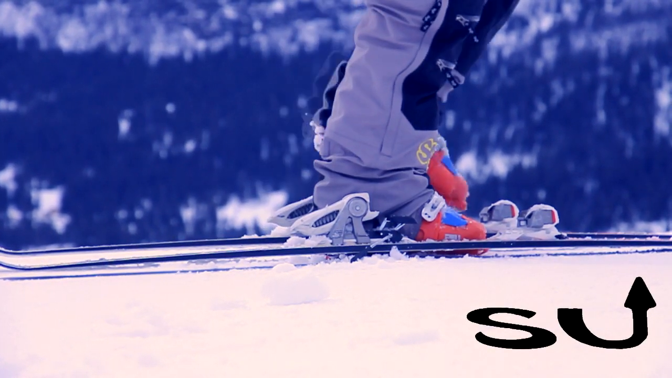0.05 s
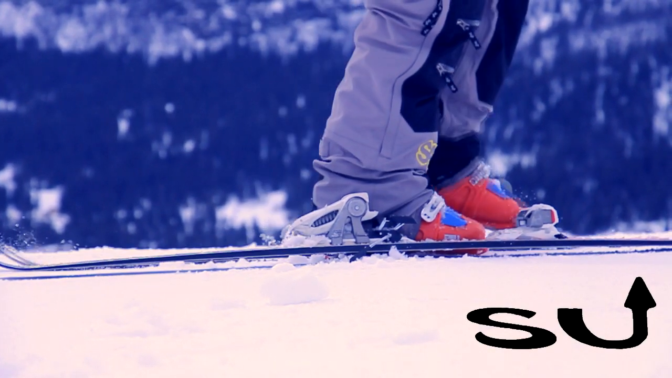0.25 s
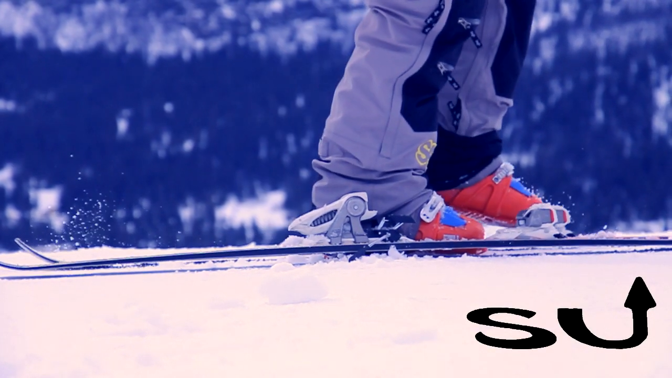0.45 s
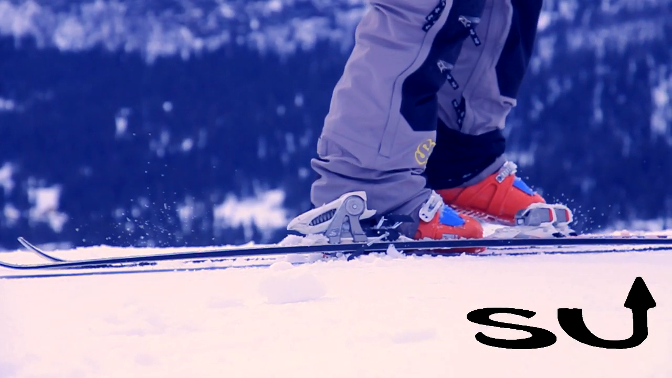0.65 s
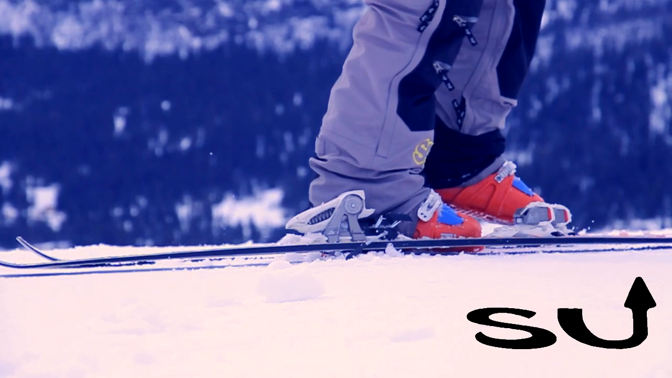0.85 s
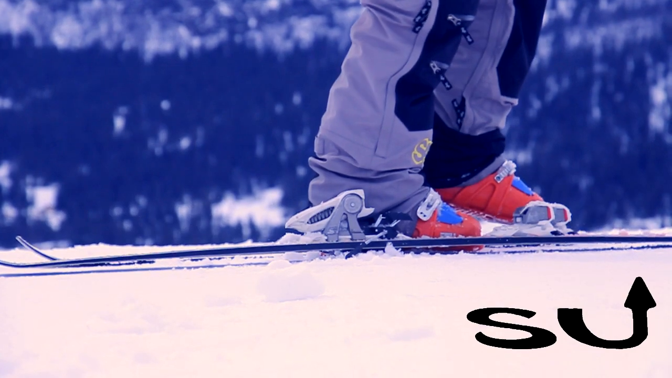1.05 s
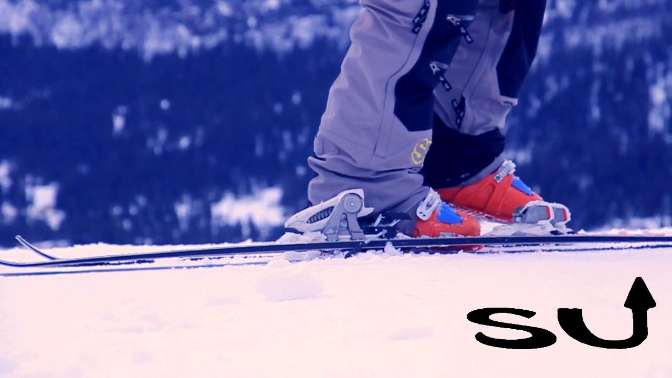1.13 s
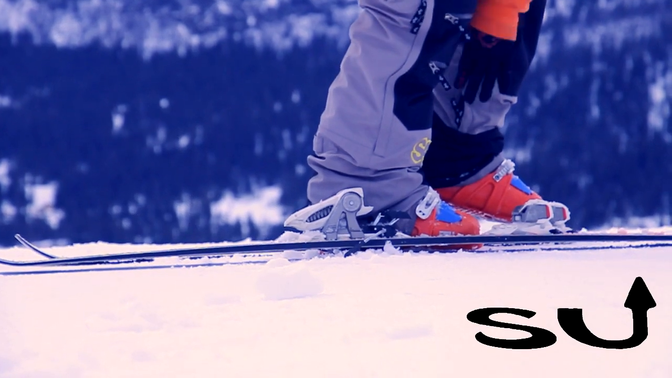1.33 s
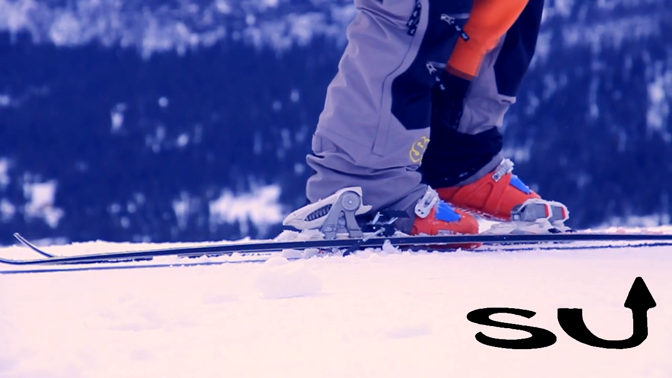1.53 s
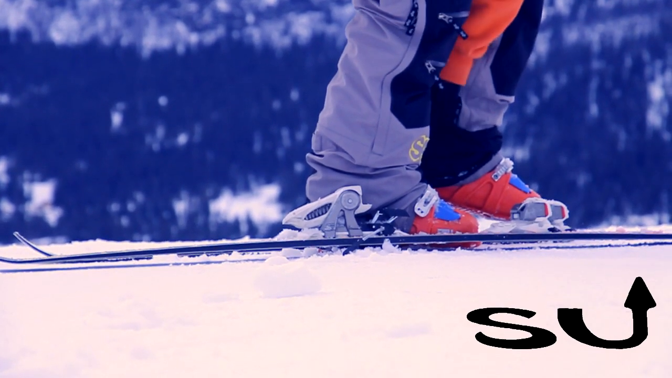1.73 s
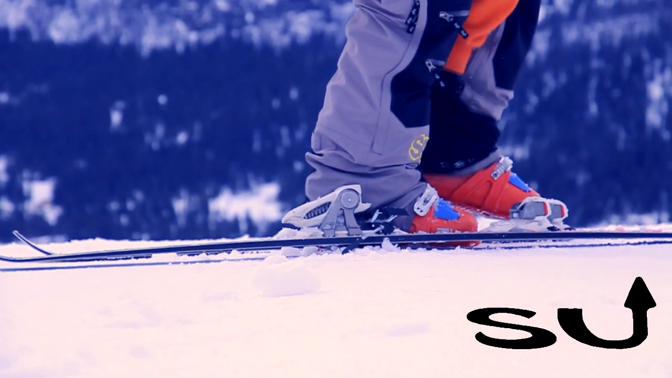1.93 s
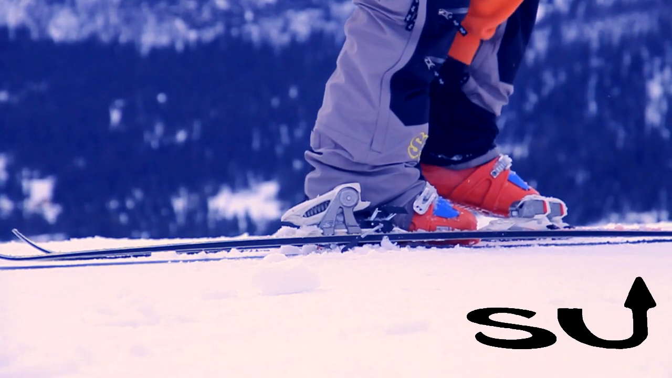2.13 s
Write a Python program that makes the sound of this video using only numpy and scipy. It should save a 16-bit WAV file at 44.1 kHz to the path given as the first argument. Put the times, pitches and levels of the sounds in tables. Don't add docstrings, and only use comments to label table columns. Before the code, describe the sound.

Ski boot knocking into its binding with a sharp heel snap, brief snow crunch, then quiet wind

```python
import sys
import numpy as np
from scipy import signal
from scipy.fft import rfft, irfft
from scipy.io import wavfile
from scipy.ndimage import uniform_filter1d, map_coordinates

SR = 44100
rng = np.random.default_rng(int(sys.argv[2]) if len(sys.argv) > 2 else 0)


def wrap_up_sound(samples):
    columns = np.atleast_2d(samples).T
    tamed = np.clip(columns, -1, 1)
    steps = np.round(tamed * 32767).astype(np.int16)
    wavfile.write(sys.argv[1], SR, steps)


def invert_db(x):
    u = np.asarray(x, float) / 20
    return 10 ** u


N = 97020

# hz, density_db_per_hz
HISS_SPECTRUM = [(18, 12.5), (60, -1.5), (186, -8.5), (400, -8), (876, -8), (4000, -5.5), (8450, -11),
                 (10800, -19), (12800, -27.5), (14100, -35), (17000, -120)]
CHANNEL_OFFSET = [
    [.00405],
    [.00086],
]
# hz, density_db_per_hz
RUSH_SPECTRUM = [(90, -11), (180, -5), (300, -3), (480, -4.5), (705, -10.5), (1230, -12.5), (1600, -13),
                 (2600, -26), (9000, -42), (13000, -77), (17000, -120)]
# time_s, level_db
RUSH_LEVEL = [(0.0, -62.5), (0.21, -59.5), (0.35, -50), (0.39, -61.5), (0.54, -62), (0.79, -63),
              (1.26, -60), (1.64, -60), (1.92, -58.5), (2.11, -59), (2.2, -63.5)]
# hz, density_db_per_hz
BUFFET_SPECTRUM = [(12, -35.5), (22, 8), (43, -4.5), (81, -6), (130, -11), (220, -25.5), (400, -50.5),
                   (700, -120)]
# time_s, level_db
BUFFET_LEVEL = [(0, -64), (.1, -63), (.19, -67), (.43, -64.5), (.67, -66.5), (.89, -64), (1.02, -61),
                (1.12, -60.5), (1.27, -63.5), (1.48, -63), (1.65, -59.5), (1.82, -59), (1.98, -65),
                (2.2, -59.5)]
# start_s, level_db, centre_hz, t60_s
RUSTLES = [(.13, -64, 1520, 0.58), (.521, -65.5, 5570, 0.056), (0.705, -58.5, 1530, 0.21),
           (0.868, -61, 830, 0.16), (1.10, -66.5, 3270, 0.11), (1.138, -51, 1850, 0.048),
           (1.21, -47, 1250, 0.032), (1.244, -59.5, 1850, 0.4), (1.29, -58, 2030, 0.2),
           (1.283, -64.5, 4750, 0.057), (1.67, -59.5, 1210, 0.18), (1.69, -66.5, 3500, 0.11),
           (1.801, -69, 2800, 0.38), (1.832, -56, 1500, 0.32), (1.849, -67, 2780, 0.28),
           (1.881, -61, 1890, 0.25), (1.98, -59, 1700, 0.14), (2.016, -60, 1550, 0.12),
           (2.073, -54, 910, 0.046), (2.12, -65, 1990, 0.17)]
# start_s, level_db, pitch_hz, t60_s
PINGS = [(.322, -42, 80.9, .12), (.34, -29, 205, .1), (.357, -39.5, 115.5, 0.12), (.378, -27, 99.85, 0.11),
         (0.325, -33.5, 376, .07), (.331, -34, 289.3, .1), (0.501, -42, 145, 0.11), (.37, -43.5, 281, 0.25),
         (.207, -31, 150.4, 0.14), (.255, -36, 265, 0.066), (0.251, -38, 549, 0.099),
         (.376, -44.5, 3090, 0.01), (.377, -53, 3400, .008), (0.378, -40, 1450, 0.03),
         (.385, -49, 1340, 0.046), (.419, -57, 1406, .025), (0.458, -57, 1500, 0.021),
         (0.464, -60, 5250, 0.0084), (0.478, -52, 1560, 0.025), (.5, -44, 1500, 0.022),
         (0.206, -31, 1000, .04), (0.2147, -43, 4250, .03), (.246, -28.5, 1675, 0.017),
         (0.244, -33.5, 2888, 0.022), (.246, -42, 5490, 0.012), (0.314, -25, 1290, 0.024),
         (0.333, -42, 1616, .04), (0.52, -50.5, 3460, 0.01), (0.5268, -47.5, 3430, 0.01),
         (.527, -66, 5800, 0.014), (1.211, -57, 1260, .04), (1.248, -54, 1763, .03),
         (1.252, -41.5, 535, 0.046), (1.284, -48.5, 1940, 0.042), (1.286, -44.5, 503, 0.07),
         (1.29, -62, 3120, 0.074), (1.83, -55, 1720, .12), (1.838, -52, 926, .04), (1.85, -55, 1390, .09),
         (2.014, -53, 1670, 0.034), (2.072, -52, 940, .04), (1.289, -53.5, 1508, 0.4),
         (1.894, -55, 1497, 0.2), (2.042, -65, 1494, 0.2)]
# hz, density_db_per_hz
SNOW_SPECTRUM = [(110, -37), (240, 0.5), (353, -4.5), (520, -5), (800, -16.5), (1480, -13), (2500, -31),
                 (6000, -35), (9000, -66), (14000, -120)]
# start_s, thud_db, clack_db, crack_db
CONTACTS = [(.199, -35.5, -36.5, -32), (0.2014, -32.5, -33.5, -31.5), (0.2051, -53, -41, -32.5),
            (.208, -28, -36, -40), (.213, -40, -40.5, -33.5), (0.218, -31, -42.5, -38.5),
            (0.224, -24.5, -64, -43), (0.226, -27.5, -52.5, -46), (0.233, -35, -52, -42),
            (.240, -26, -47, -46), (.244, -22.5, -34, -35), (0.2459, -23.5, -34.5, -31),
            (0.252, -49, -50, -41), (.257, -26, -41.5, -36), (0.265, -28, -48, -40), (.278, -35, -64, -50),
            (0.294, -30.5, -52, -47), (0.3055, -24.5, -26, -32), (0.31, -30, -31.5, -59.5),
            (.316, -35, -34, -35.5), (0.326, -56, -40, -61), (0.332, -25.5, -33.5, -48),
            (0.339, -31.5, -46, -67), (0.346, -20.5, -46, -64), (0.354, -35, -59, -72),
            (.379, -59, -44, -64), (0.418, -55, -62, -51), (.478, -62, -65, -61), (0.499, -61, -76, -53.5)]
# pitch_hz, level_db, t60_s
SKI_MODES = [(81.6, -3.5, 0.17), (115.5, -3, 0.13), (160, 2, 0.068), (209.8, 1.5, 0.071), (265, -16, 0.079)]
# pitch_hz, level_db, t60_s
BINDING_MODES = [(320, 4, 0.054), (386.6, 0.5, 0.0695), (517, 0.5, 0.06), (708, -2.5, 0.027),
                 (952, -1.5, 0.029), (1316, -2, 0.036), (1635, -1.5, 0.044), (2200, -31, 0.01),
                 (2730, -7, 0.011), (3960, -34, 0.029), (5400, -29, 0.013)]
# hz, density_db_per_hz
CRACK_SPECTRUM = [(400, -9.5), (900, -4.5), (1630, -9.5), (3770, -18.5), (5680, -21.5), (8910, -39),
                  (10800, -56), (14100, -63), (17000, -120)]
# pitch_hz, level_db, t60_s
HEEL_MODES = [(121, -12, 0.03), (158, -2.5, 0.1), (239, 1.5, 0.06), (311, 1, 0.05), (545, -1, 0.03),
              (681, -1.5, 0.035), (807, -4, 0.026), (1007, -12, 0.023), (1340, -2, 0.029),
              (1686, -6, 0.042), (1850, -15.5, 0.033), (2490, -16.5, 0.037), (3580, -18, .02)]

TIME_S = np.arange(N) / SR
HARD_ONSET_S = 0.00026


def unit(x):
    return x / np.sqrt(np.mean(x ** 2) + 1e-20)


def curve(rows):
    return np.interp(TIME_S, *np.transpose(rows))


def wobble(rate_hz):
    knots = rng.standard_normal(int(N * rate_hz / SR) + 4)
    return map_coordinates(knots, [np.arange(N) * rate_hz / SR])


def noise(spectrum, patchy_db, channels=1):
    z = signal.stft(rng.standard_normal((channels, N)), nperseg=512)[2]
    field = uniform_filter1d(rng.standard_normal(z.shape[1:]), size=5, axis=0)
    field = uniform_filter1d(field, size=8, axis=1)
    patchy = signal.istft(z * invert_db(patchy_db * unit(field)), nperseg=512)[1][:, :N]
    knot_hz, knot_db = np.transpose(spectrum)
    hz = np.fft.rfftfreq(N, 1 / SR)
    gain = invert_db(np.interp(np.log(hz + 1), np.log(knot_hz + 1), knot_db))
    return unit(irfft(rfft(patchy) * gain, N))


def dying(start_s, level_db, t60_s, attack_s):
    t = np.maximum(TIME_S - start_s, 0)
    return invert_db(level_db - 60 * t / t60_s) * (1 - np.exp(-t / attack_s))


def ring(modes, level_db, onset_s, vary=1):
    scatter_db, detune = 5.5, 0.047
    t = np.arange(SR // 4) / SR
    hz, mode_db, t60_s = np.transpose(modes)[:, :, None]
    chance = vary * rng.standard_normal((2, len(modes), 1))
    decay = invert_db(level_db + mode_db + scatter_db * chance[0] - 60 * t / t60_s)
    tones = decay * np.sin(2 * np.pi * hz * (1 + detune * chance[1]) * t)
    return tones.sum(axis=0) * (1 - np.exp(-t / onset_s)) / 2


def add_blow(out, start_s, blow):
    out[round(start_s * SR):][:SR // 4] += blow


def hiss():
    return invert_db(-76) * noise(HISS_SPECTRUM, patchy_db=0.2, channels=2)


def wind():
    rush_db = curve(RUSH_LEVEL) + 0.5 + 0.46 * wobble(12.73) + 1.66 * wobble(50.14)
    rush = invert_db(rush_db) * noise(RUSH_SPECTRUM, patchy_db=0.9)[0]
    buffet_db = curve(BUFFET_LEVEL) + 5.5 + 1.2 * wobble(9.47)
    return rush + invert_db(buffet_db) * noise(BUFFET_SPECTRUM, patchy_db=0.9)[0]


def rustles():
    q, grain_db = 1.3, 3.2
    top_ratio = 1.54
    hz, out = np.fft.rfftfreq(N, 1 / SR), np.zeros(N)
    for start_s, level_db, centre_hz, t60_s in RUSTLES:
        damping = 1j * hz * centre_hz / q
        band = damping / (centre_hz ** 2 - hz ** 2 + damping)
        gain = band ** 2 / (1 + (hz / centre_hz / top_ratio) ** 8)
        grit = rng.standard_normal(N) * unit(invert_db(grain_db * wobble(250)))
        burst = unit(irfft(rfft(grit) * gain, N))
        out += dying(start_s, level_db, t60_s, attack_s=0.0051) * burst
    return out


def pings():
    waver_rad, out = 0.18 * wobble(29.5), np.zeros(N)
    for start_s, level_db, pitch_hz, t60_s in PINGS:
        tone = np.sin(2 * np.pi * pitch_hz * TIME_S + waver_rad)
        out += dying(start_s, level_db, t60_s, attack_s=3 / pitch_hz) * tone
    return out


def settling_snow():
    still_s, fade_s = 0.563, 0.0058
    moving = 1 / (1 + np.exp(np.clip((TIME_S - still_s) / fade_s, -50, 50)))
    level = dying(start_s=0.242, level_db=-48, t60_s=1.9, attack_s=0.0081)
    flutter = invert_db(2.0 * wobble(90.3))
    return level * moving * flutter * noise(SNOW_SPECTRUM, patchy_db=-1.4)[0]


def contacts():
    soft_onset_s, low_cut_hz = 0.0011, 89
    blows, spit = np.zeros(N), np.zeros(N)
    for start_s, thud_db, clack_db, crack_db in CONTACTS:
        thud = ring(SKI_MODES, thud_db, soft_onset_s)
        clack = ring(BINDING_MODES, clack_db, HARD_ONSET_S)
        add_blow(blows, start_s, thud + clack)
        spit += dying(start_s, crack_db, t60_s=0.018, attack_s=0.00087)
    low_cut = signal.butter(2, low_cut_hz, "high", fs=SR, output="sos")
    return signal.sosfilt(low_cut, blows) + spit * noise(CRACK_SPECTRUM, patchy_db=0.15)[0]


def snap():
    out = np.zeros(N)
    add_blow(out, 0.3052, ring(HEEL_MODES, -18, HARD_ONSET_S, vary=0))
    return out


def scene():
    mono = wind() + rustles() + pings() + settling_snow() + contacts() + snap()
    return np.tile(mono, (2, 1))


def low_pass(x):
    return signal.sosfilt(signal.butter(12, 14200, fs=SR, output="sos"), x)


def record(dry):
    mix = dry + hiss() + CHANNEL_OFFSET
    return low_pass(mix)


dry = scene()
out = record(dry)
wrap_up_sound(out)
```